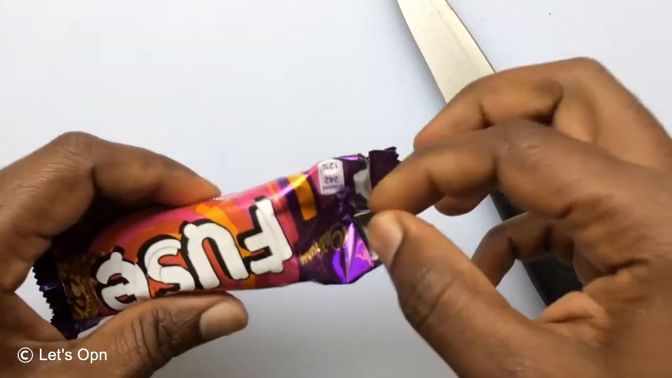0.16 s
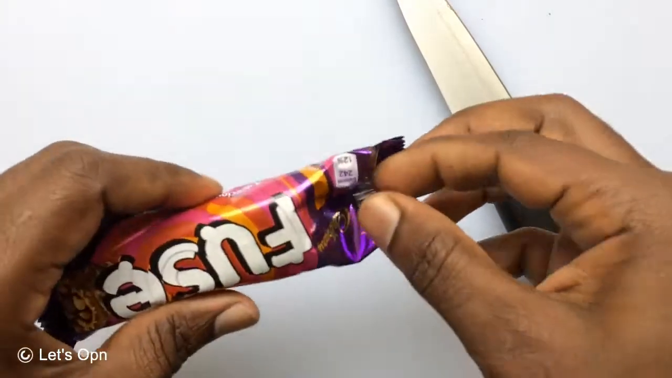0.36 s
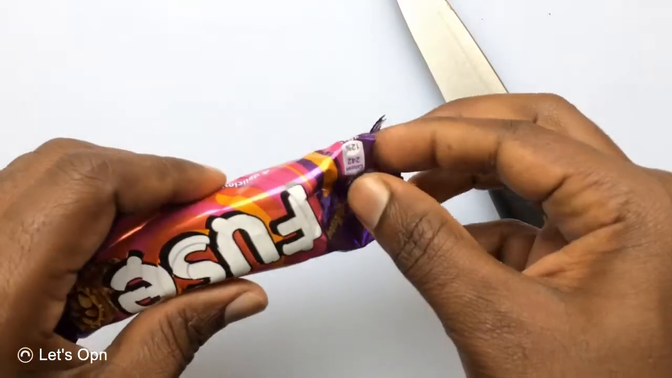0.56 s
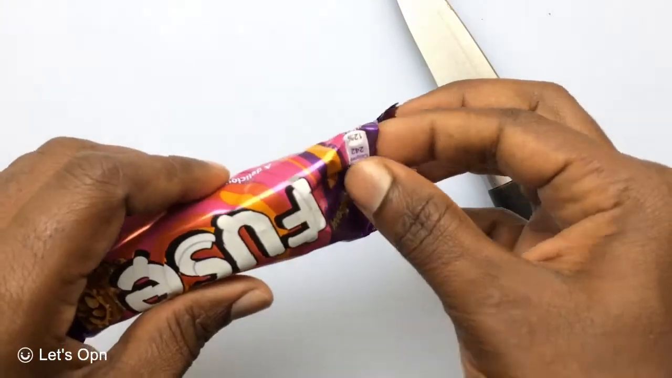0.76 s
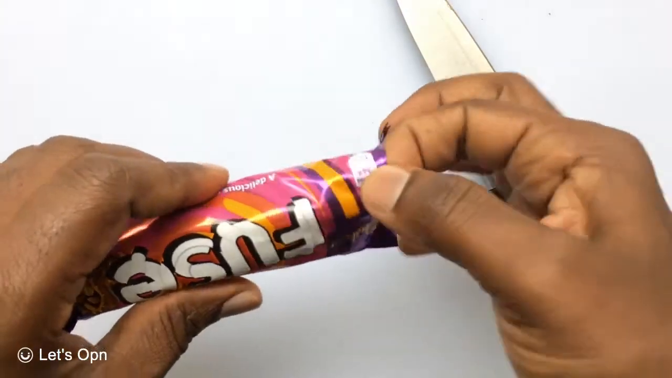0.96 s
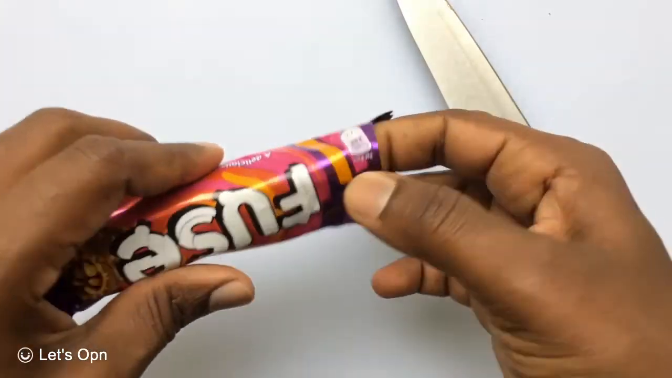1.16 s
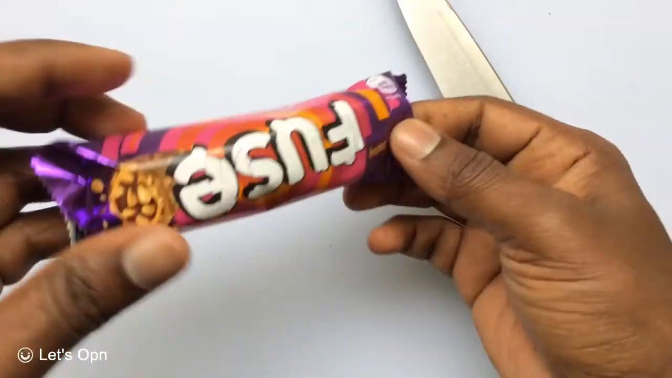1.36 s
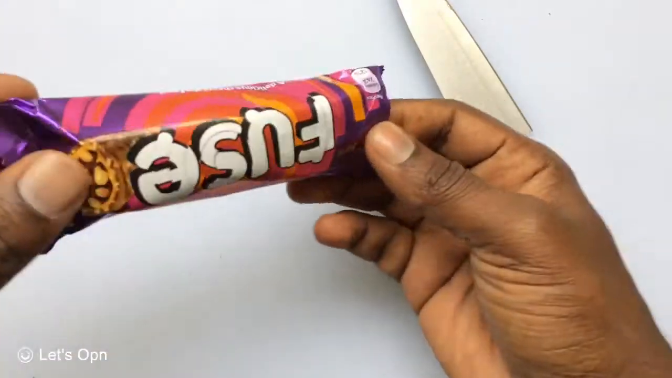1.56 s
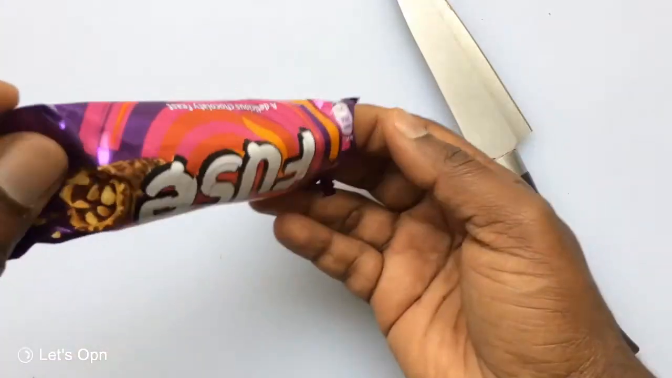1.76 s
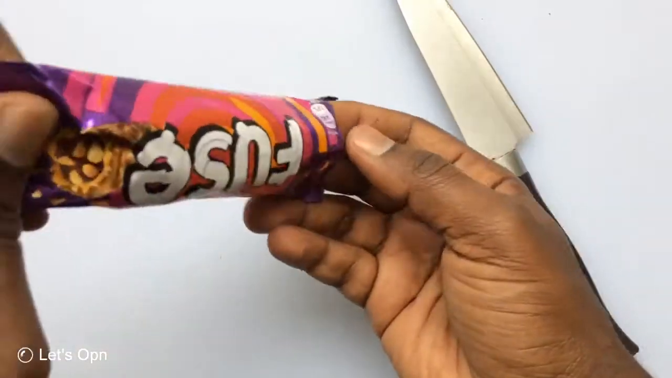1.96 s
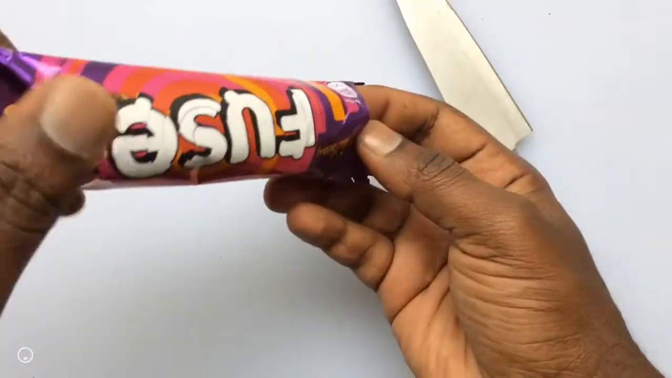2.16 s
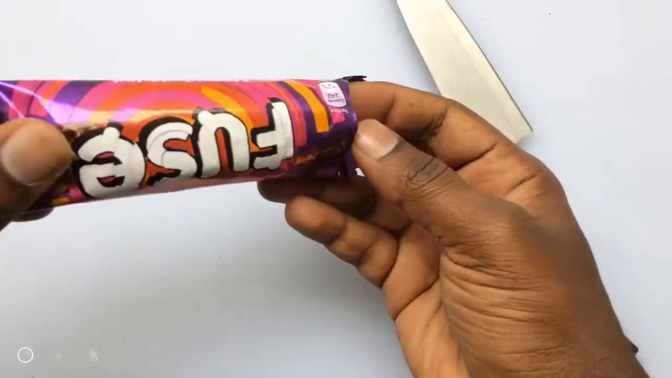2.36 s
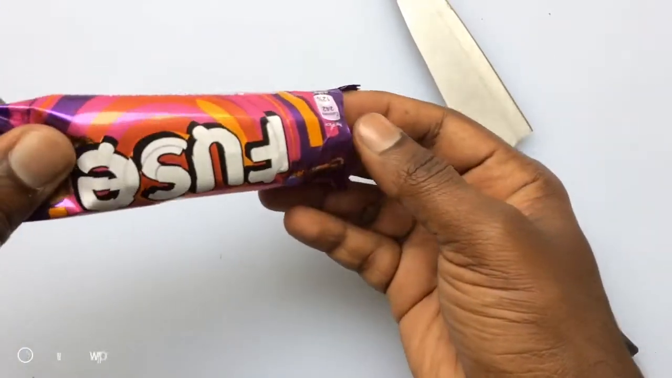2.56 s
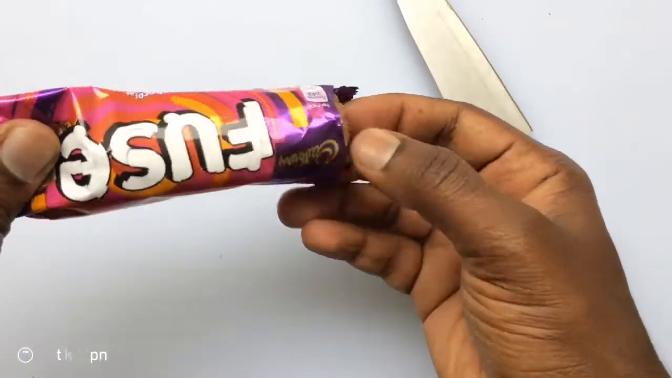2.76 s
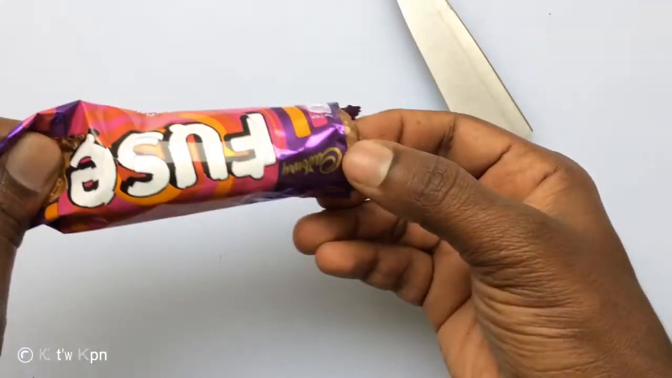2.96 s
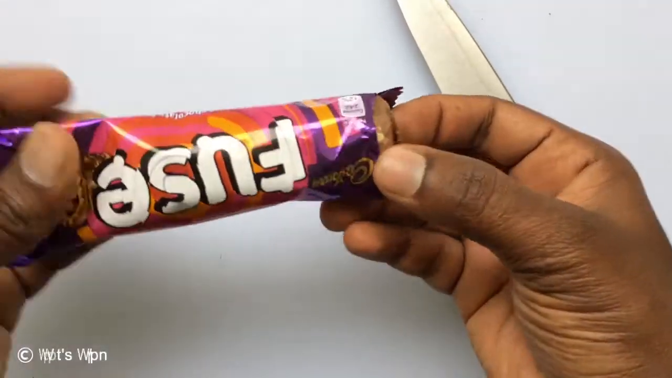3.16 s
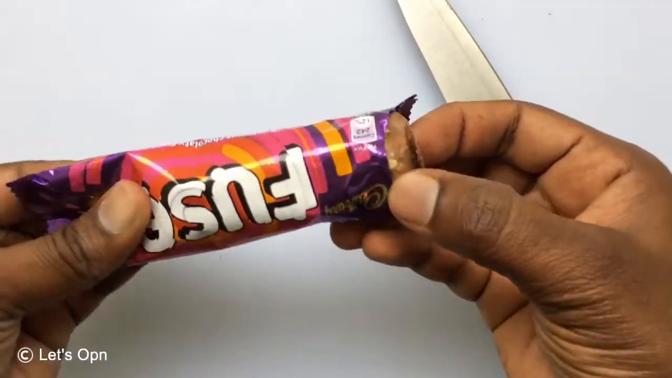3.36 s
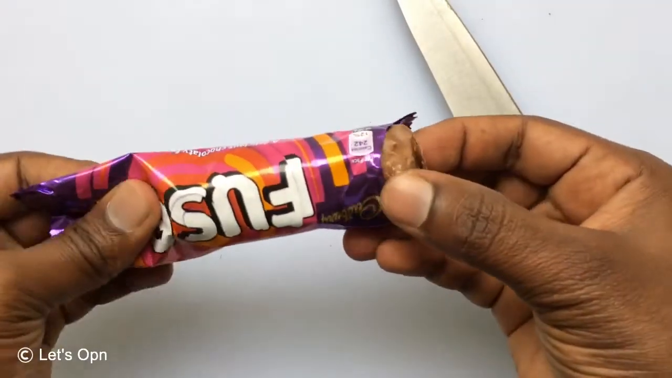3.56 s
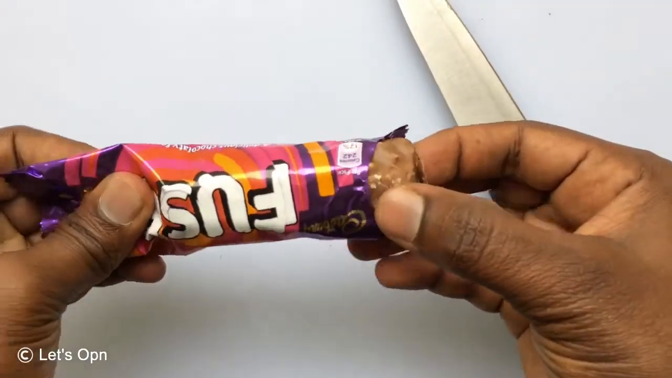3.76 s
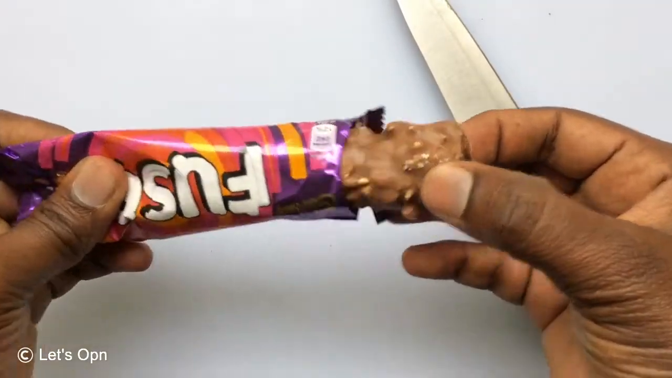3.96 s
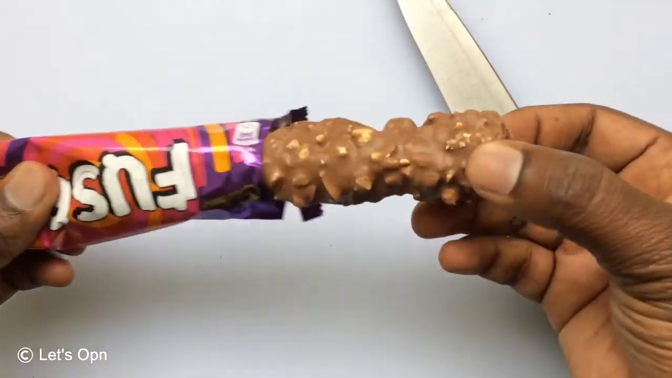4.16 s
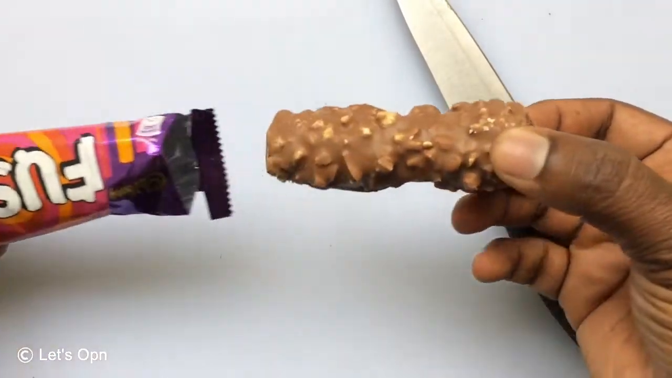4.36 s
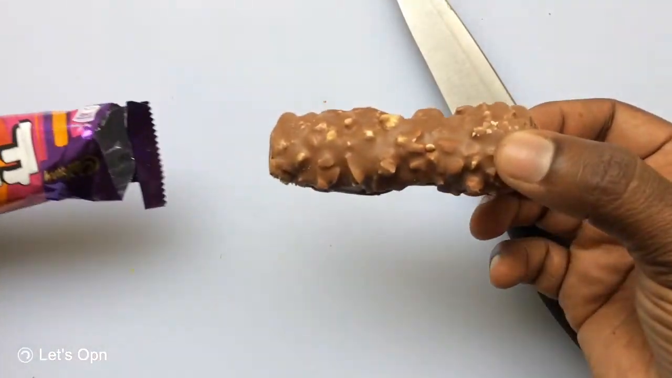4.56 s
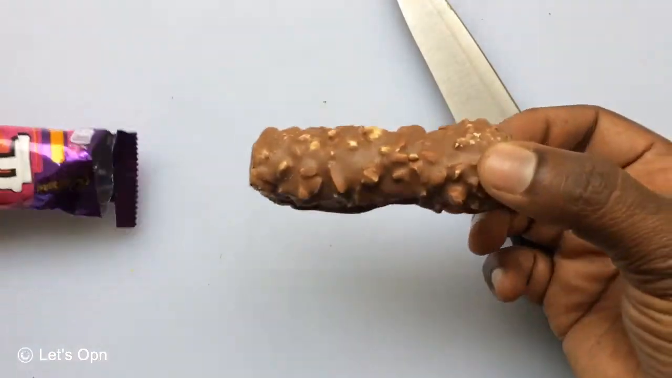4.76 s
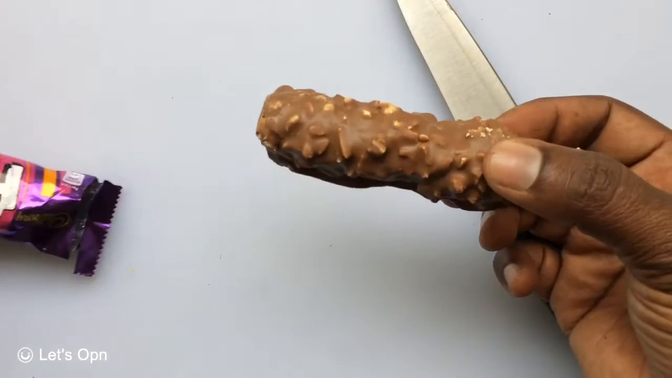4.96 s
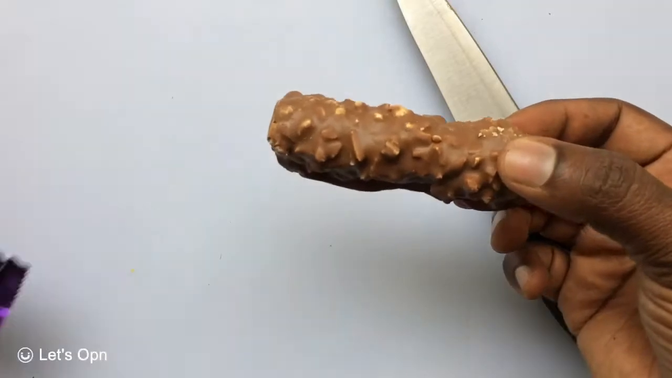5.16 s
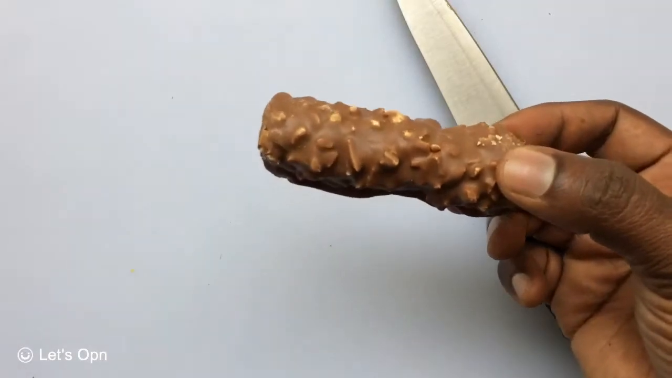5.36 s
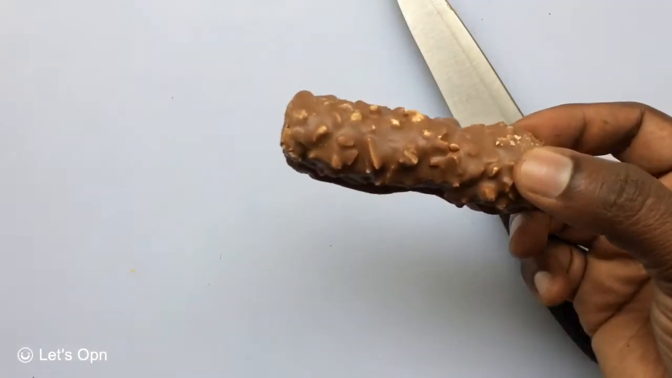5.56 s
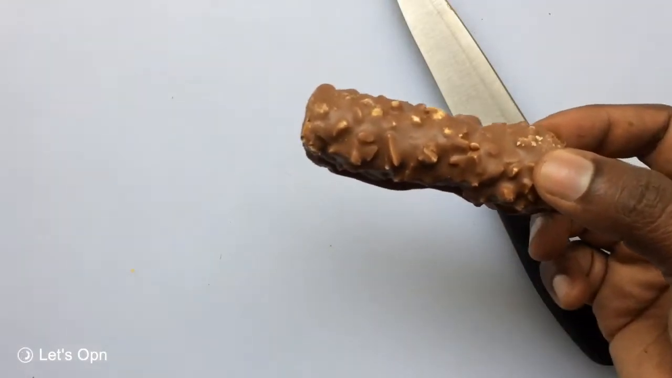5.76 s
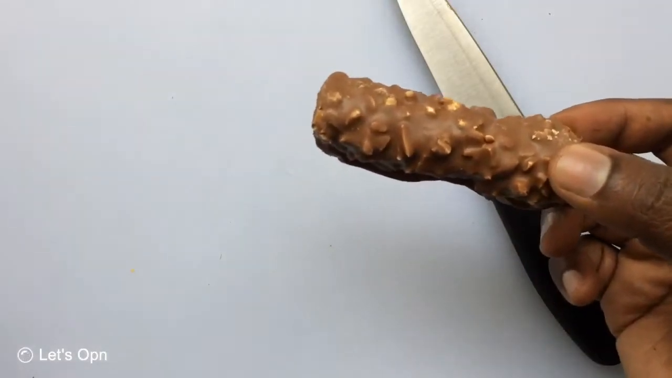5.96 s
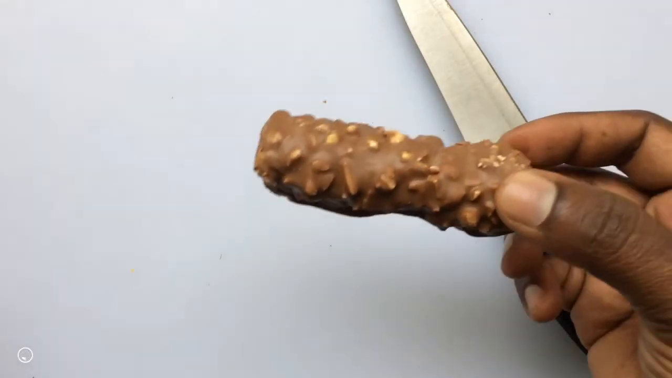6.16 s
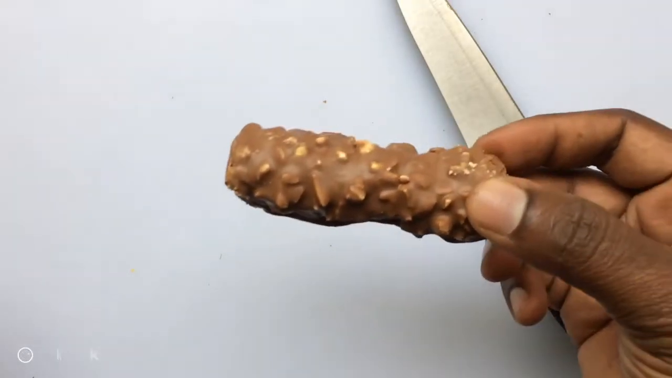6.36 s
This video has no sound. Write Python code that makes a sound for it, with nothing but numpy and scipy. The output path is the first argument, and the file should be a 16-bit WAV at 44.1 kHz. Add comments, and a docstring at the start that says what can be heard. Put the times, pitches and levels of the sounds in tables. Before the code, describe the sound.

Close, crisp wrapper crinkling with bright pops and rubbing hiss, a few soft thuds, then quiet room with low street rumble.

```python
"""A small room: fingers squeeze and pull a thin metallised plastic wrapper close to a microphone.
Sharp snaps and fine crackle are noise bursts through damped panel resonances, each with a room tail.
Rubbing hiss and low traffic rumble from outside are patchy coloured noise under slow level curves.
Soft thuds are decaying noise with a hollow note; a few faint thin tones are wavering sines."""
import sys
import numpy as np
from scipy import signal
from scipy.fft import rfft, irfft, next_fast_len
from scipy.io import wavfile
from scipy.ndimage import uniform_filter1d, map_coordinates

SR = 44100
rng = np.random.default_rng(int(sys.argv[2]) if len(sys.argv) > 2 else 0)


def output_pcm(signal):
    """Save a mono or channel-first signal as 16-bit PCM at the path in sys.argv[1].

    Samples are clipped to [-1, 1] before scaling.
    """
    pcm = np.clip(np.atleast_2d(signal).T, -1, 1) * 32767
    wavfile.write(sys.argv[1], SR, np.round(pcm).astype(np.int16))


N = 286650


def amp(db):
    """Decibels to gain."""
    return 10 ** (np.asarray(db) / 20)


def unit(x):
    """Scaled to rms 1."""
    return x / np.sqrt(np.mean(x ** 2) + 1e-20)


def wobble(knots_per_s):
    """Smooth random curve: a spline through normal random knots."""
    knots = rng.standard_normal(int(N * knots_per_s / SR) + 4)
    return map_coordinates(knots, [np.arange(N) * knots_per_s / SR])


def curve(s, value):
    """Straight lines through (s, value), one value per sample."""
    return np.interp(np.arange(N) / SR, s, value)


def filtered(x, response):
    """x times a response of frequency in Hz."""
    m = next_fast_len(N + 8192)
    spectrum = rfft(x, m) * response(np.fft.rfftfreq(m, 1 / SR))
    return irfft(spectrum, m)[..., :N]


def hiss(spectrum, patchy_db):
    """Coloured noise of rms 1 whose time-frequency patches have random gain."""
    z = signal.stft(rng.standard_normal(N), nperseg=256)[2]
    field = uniform_filter1d(rng.standard_normal(z.shape), 8, 0)
    field = uniform_filter1d(field, 8, 1)
    patchy = signal.istft(z * amp(patchy_db * unit(field)), nperseg=256)[1][:N]
    hz, db = np.transpose(spectrum)
    return unit(filtered(patchy, lambda f: amp(np.interp(np.log(f + 1), np.log(hz + 1), db))))


# Street noise colour. Each row: frequency in Hz, relative density in dB per Hz.
STREET_SPECTRUM = [(20, -18), (108, 8), (180, -1.5), (255, -19), (450, -18), (800, -24), (3000, -32.5),
                   (16000, -58.5)]
# Traffic swell. Each row: time in seconds, rumble level in dB.
TRAFFIC_LEVEL = [(0, -45), (2.4, -46.5), (3.6, -44.5), (4.901, -46), (6.5, -47.5)]


def street():
    """Traffic rumble that swells slowly, with the room's faint hiss above it in the same noise."""
    swell_db = 1.2 * wobble(1.5) + wobble(7)
    level_db = curve(*np.transpose(TRAFFIC_LEVEL)) + swell_db
    return amp(level_db) * hiss(STREET_SPECTRUM, patchy_db=1.3)


# Faint thin tones from far away. Each row: start in seconds, end in seconds, pitch in Hz, level in dB.
FAR_TONES = [(.355, .43, 2110, -55), (5.08, 5.2, 740, -63), (6, 6.18, 2910, -64), (6.26, 6.44, 2910, -63),
             (6.48, 6.6, 2910, -62), (5.99, 6.31, 1294, -64), (6.32, 6.43, 1294, -64),
             (6.42, 6.6, 1294, -60)]


def tones():
    """Sines that fade in and out quickly, wavering in pitch and fluttering in level."""
    t = np.arange(N) / SR
    phase_per_hz = 2 * np.pi * np.cumsum(1 + .005 * wobble(90)) / SR
    out = np.zeros(N)
    for start_s, end_s, hz, db in FAR_TONES:
        fade = np.clip(np.minimum(t - start_s, end_s - t) / .03, 0, 1)
        out += amp(db + 3 * wobble(40)) * fade * np.sin(hz * phase_per_hz)
    return out


# Fingers press the bar or tap the table. Each row: start in seconds, strength in dB.
CONTACTS = [(0.585, -26.5), (1.314, -15), (2.219, -19.5), (2.272, -18), (2.312, -16), (2.396, -27),
            (3.501, -18.5), (3.56, -22.5), (3.582, -31), (4.022, -13), (5.598, -17), (6.177, -19.5)]


def thuds():
    """Soft contacts: a low knock on a hollow note of its own, then a rattle of weaker taps as the bar settles."""
    out, t = np.zeros(N + SR), np.arange(SR // 8) / SR
    attack = 1 - np.exp(-t / 0.00092)
    knock = amp(-60 * t / 0.018)
    for start_s, db in CONTACTS:
        taps = amp(6 * wobble(150)[:len(t)])
        rattle = taps * amp(-12.5 - 60 * t / 0.18)
        puff = rng.standard_normal(len(t)) * (knock + rattle) * attack
        note_hz = 720 * np.exp(0.13 * rng.standard_normal())
        hollow = signal.lfilter(*signal.iirpeak(note_hz, 3, SR), puff)
        out[round(start_s * SR):][:len(t)] += amp(db) * (puff + hollow)
    band = signal.butter(2, [230, 1800], "bandpass", fs=SR, output="sos")
    return signal.sosfilt(band, out[:N])


def peak(hz, centre_hz, width_hz):
    """Response of a damped resonance, 1 at its centre."""
    return 1j * hz * width_hz / (centre_hz ** 2 - hz ** 2 + 1j * hz * width_hz)


def panel_colours(hz, panel_hz):
    """The freed panel: a damped resonance with a sharper core; neighbouring panels ring along."""
    spread = np.exp(.45 * rng.standard_normal((len(panel_hz), 3)))
    neighbour_hz = panel_hz * spread.T[:, :, None]
    broad = .7 * peak(hz, panel_hz, 1.52 * panel_hz)
    core = 1.65 * peak(hz, panel_hz, 0.15 * panel_hz)
    neighbour_width_hz = 0.083 * np.maximum(neighbour_hz, panel_hz)
    neighbours = 1.14 * peak(hz, neighbour_hz, neighbour_width_hz).sum(axis=0)
    panel = (broad + core - neighbours) / (1 + 1j * hz / (2 * panel_hz))
    return panel, broad


def crack_colour(hz, count):
    """The crack: broad noise from 3 to 11 kHz, each with its own bright spot."""
    crack = (1j * hz / (3000 + 1j * hz)) ** 2 / (1 + 1j * hz / 11000)
    spot_hz = 2500 * 5 ** rng.random((count, 1))
    return crack * (1 + 2 * peak(hz, spot_hz, spot_hz / 5))


def bursts(rows, size, ring_db):
    """Each row (s, panel Hz, panel dB, crack dB) rings one panel, cracks broadly and leaves its room tail."""
    t, hz = np.arange(size) / SR, np.fft.rfftfreq(2 * size, 1 / SR)
    when_s, panel_hz, panel_db, crack_db = rows.T[:, :, None]
    panel, broad = panel_colours(hz, panel_hz)
    crack = crack_colour(hz, len(rows))
    # a faint noise swells for about 3 ms before each snap
    lead = SR // 300
    after = np.maximum(t - lead / SR, 0)
    lead_in = np.minimum(t * SR / lead, 1) ** 2 * amp(-21 - 60 * after / .01)
    attack, tail_attack = 1 - np.exp(-after / 0.00045), 1 - np.exp(-after / 0.0087)
    # small, high panels fall silent sooner, and so does their echo
    lasting = np.sqrt(3000 / panel_hz)
    at = np.maximum(np.round(when_s * SR).astype(int) + np.arange(size) - lead, 0)
    out = np.zeros(N + size)
    # colour, echo colour, level dB, strike T60 s, ring T60 s, room dB, room T60 s; walls blur the panel's pitch
    parts = ((panel, broad, panel_db, .0055, 0.037 * lasting, -27, 0.24 * lasting),
             (crack, crack, crack_db, .004, .03, -30, .15))
    for colour, echo, db, t60, ring_t60, room_db, room_t60 in parts:
        blow = (amp(-60 * after / t60) + amp(ring_db - 60 * after / ring_t60)) * attack
        tail = amp(room_db - 60 * after / room_t60) * tail_attack
        noise = rng.standard_normal((len(rows), size))
        direct = rfft(noise * (blow + lead_in), 2 * size) * colour
        room = rfft(noise * tail, 2 * size) * echo
        y = irfft(direct + room)[:, :size]
        # level: rms of the first 4 ms of the snap itself
        first_4ms = y[:, lead:lead + SR // 250]
        y *= amp(db) / np.sqrt(np.mean(first_4ms ** 2, axis=1, keepdims=True))
        out += np.bincount(at.ravel(), y.ravel(), N + size)[:N + size]
    return out[:N]


# How hard the fingers work the film. Each row: time in seconds, crackle drive in dB, rubbing hiss in dB.
FILM_WORK = [(0, -40, -42), (0.299, -70, -62), (0.578, -54, -48.5), (0.839, -70, -61), (1.09, -39.5, -44),
             (1.439, -45, -39), (1.68, -53, -47), (2.002, -37, -36.5), (2.188, -45, -49), (2.297, -43, -42),
             (2.57, -47, -53.5), (2.922, -41, -43.5), (3.139, -52, -50), (3.4, -46, -46), (4.33, -46, -41),
             (4.55, -70.5, -60.5), (5.299, -69.5, -62), (5.551, -60, -51), (5.998, -76, -71),
             (6.5, -75.5, -69)]
# Colour of skin on film. Each row: frequency in Hz, relative density in dB per Hz.
RUB_SPECTRUM = [(250, 1.5), (1200, 8), (2800, 9), (7000, 1.5), (16000, -9)]


def rustle(count):
    """Small creases give way at random, in clumps, more often the harder the film is worked, over skin hiss."""
    s, work, rub = np.transpose(FILM_WORK)
    work_db, rub_db = curve(s, work), curve(s, rub)
    busy = np.cumsum(amp(.5 * work_db + 6 * wobble(20)))
    moment, rarity, pitch, dullness = rng.random((count, 4)).T
    at = np.searchsorted(busy, moment * busy[-2])
    # most creases are faint, a few stand out
    size_db = work_db[at] + 2 - 5.97 * np.log(1 - .9 * rarity)
    panel_hz = 1500 * 4.76 ** pitch
    rows = np.c_[at / SR, panel_hz, size_db, size_db - 3 - 12 * dullness]
    crackle = bursts(rows, size=768, ring_db=-22)
    rubbing = amp(rub_db + 2.5 * wobble(30)) * hiss(RUB_SPECTRUM, patchy_db=4)
    return crackle + rubbing


# Buckling creases. Each row: time in seconds, pitch of the freed panel in Hz, panel level in dB, crack level in dB.
CREASES = [(0.011, 3950, -20, -24.5), (0.039, 3520, -18, -18), (0.064, 3300, -23.5, -21),
           (0.077, 700, -28.5, -24), (0.111, 6450, -25, -28), (0.157, 3100, -28.5, -32),
           (0.234, 3020, -32.5, -35), (0.431, 3130, -38.5, -38.5), (0.462, 2860, -22, -31),
           (0.498, 1420, -37.5, -62), (0.54, 2700, -36.5, -52.5), (0.554, 2960, -32, -33),
           (0.586, 5650, -17.5, -19), (0.659, 1600, -38, -43), (0.754, 3200, -37, -39),
           (0.941, 2700, -28.5, -25), (0.976, 6760, -28.5, -21.5), (0.983, 3160, -21, -32),
           (1.026, 3200, -23, -22.5), (1.045, 2800, -19.5, -38.5), (1.053, 2800, -18, -30),
           (1.061, 3100, -14, -16), (1.07, 5430, -16.5, -35.5), (1.114, 2000, -20, -17),
           (1.126, 3000, -33, -34.5), (1.164, 5900, -34, -14), (1.21, 6300, -18, -20.5),
           (1.229, 1760, -25.5, -34), (1.256, 1870, -27.5, -29.5), (1.28, 2700, -24.5, -38.5),
           (1.314, 5950, -15.5, -15), (1.463, 3040, -14, -16.5), (1.54, 2680, -21.5, -16.5),
           (1.625, 4000, -30, -46), (1.703, 1540, -28.5, -28), (1.749, 2220, -15, -16.5),
           (1.813, 3320, -14, -12), (1.882, 6400, -29.5, -22.5), (1.896, 6500, -27, -20),
           (1.913, 3400, -17.5, -20), (1.93, 5650, -11.5, -24.5), (1.97, 3000, -23, -19),
           (1.976, 1570, -24, -25.5), (1.988, 6200, -21.5, -12.5), (2.039, 7000, -27.5, -25),
           (2.056, 5900, -26, -31.5), (2.091, 5000, -25.5, -22.5), (2.219, 4300, -21, -22.5),
           (2.272, 3520, -24, -25), (2.312, 3260, -17.5, -18), (2.355, 4540, -30, -23.5),
           (2.393, 2000, -30, -35.5), (2.411, 2800, -19, -26.5), (2.419, 1950, -29, -20.5),
           (2.492, 2050, -25.5, -24), (2.525, 2900, -27.5, -31), (2.584, 6260, -20, -35.5),
           (2.624, 4500, -30.5, -24.5), (2.639, 4460, -17, -11.5), (2.679, 7240, -33, -18),
           (2.747, 6040, -20.5, -31), (2.789, 4300, -24, -29), (2.809, 6860, -23, -21),
           (2.82, 4160, -18.5, -15), (2.87, 4860, -28, -29.5), (2.895, 4200, -20, -26),
           (2.933, 9100, -16, -26), (2.957, 6450, -22, -15), (2.981, 6300, -17.5, -16),
           (2.99, 5570, -24, -16), (2.998, 6100, -11, -28.5), (3.124, 2730, -25.5, -22.5),
           (3.21, 2790, -22.5, -17.5), (3.235, 3460, -23, -18), (3.248, 1350, -18, -13.5),
           (3.276, 2850, -19.5, -17), (3.29, 2960, -18, -27.5), (3.315, 7900, -27, -30.5),
           (3.366, 3480, -24.5, -24), (3.389, 3770, -27, -26), (3.416, 2820, -30, -32.5),
           (3.435, 2470, -24, -42), (3.45, 5900, -25.5, -37.5), (3.492, 1710, -25, -27.5),
           (3.503, 1760, -21.5, -20.5), (3.522, 3300, -23, -21.5), (3.618, 4830, -25.5, -27.5),
           (3.67, 5600, -27, -26.5), (3.685, 3300, -23.5, -34.5), (3.702, 1620, -24, -22.5),
           (3.791, 4750, -27.5, -20), (3.872, 6800, -31, -18), (3.895, 3040, -17.5, -17.5),
           (3.959, 3960, -32.5, -29), (4.045, 2700, -10.5, -20.5), (4.073, 4330, -28.5, -20.5),
           (4.117, 4600, -29, -31.5), (4.135, 8300, -24.5, -28.5), (4.159, 2500, -16.5, -24.5),
           (4.267, 2100, -25.5, -44), (4.324, 3850, -13.5, -22.5), (4.489, 4600, -41, -38),
           (4.601, 2840, -40, -58.5), (4.687, 2780, -34.5, -32.5), (4.843, 5400, -26, -48),
           (5.037, 2730, -40, -52), (5.053, 3300, -39, -64), (5.313, 7800, -42, -66.5),
           (5.418, 5400, -26.5, -46), (5.471, 3100, -22.5, -33), (5.563, 2900, -40.5, -42),
           (5.812, 1860, -38.5, -73), (5.91, 1510, -41.5, -58), (6.178, 2020, -28, -34)]


def snaps():
    """Loud creases; each sets off a weaker, smaller or larger neighbour within 22 milliseconds."""
    rows = np.array(CREASES)
    later, other, weaker = rng.random((len(rows), 3)).T
    when_s, panel_hz, panel_db, crack_db = rows.T
    drop_db = 9 + 14 * weaker
    neighbour_hz = panel_hz * np.exp(other - .5)
    neighbours = np.c_[when_s + .022 * later, neighbour_hz, panel_db - drop_db, crack_db - drop_db]
    followers = bursts(neighbours, size=1024, ring_db=-14)
    return bursts(rows, size=6144, ring_db=-14) + followers


def scene():
    """Wrapper near, street and tones far."""
    near = snaps() + thuds() + rustle(count=500)
    return (near + street() + tones())[None]


def record(dry):
    """The amplifier rounds off the highest peaks; the microphone fades at the top, the recorder cuts off above."""
    ceiling, fade_hz, cutoff_hz = .92, 15000, 16450
    soft = dry / (1 + np.abs(dry / ceiling) ** 4) ** (1 / 4)
    return filtered(soft, lambda hz: (hz < cutoff_hz) / (1 + (hz / fade_hz) ** 40))


dry = scene()
out = record(dry)
output_pcm(out)
```